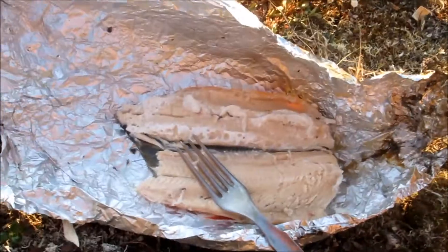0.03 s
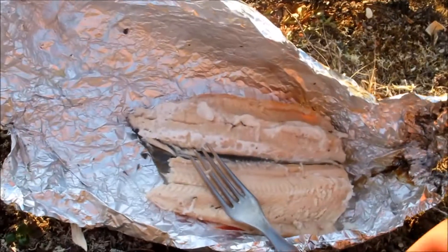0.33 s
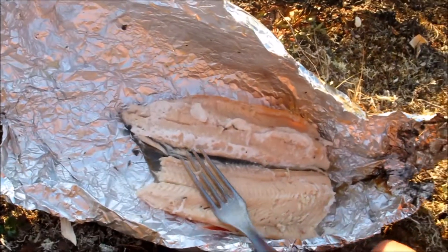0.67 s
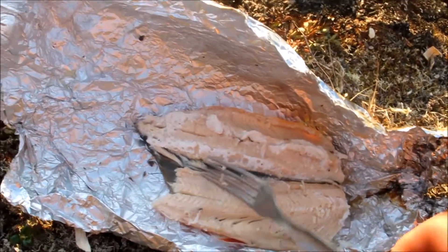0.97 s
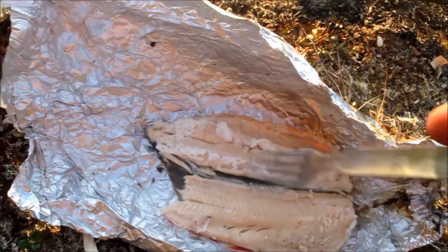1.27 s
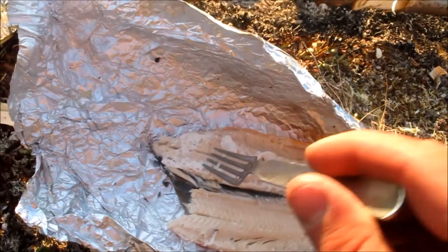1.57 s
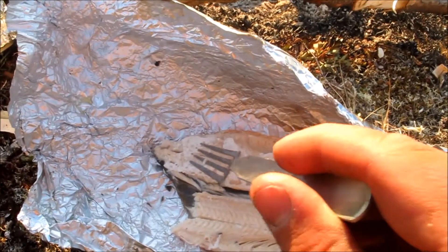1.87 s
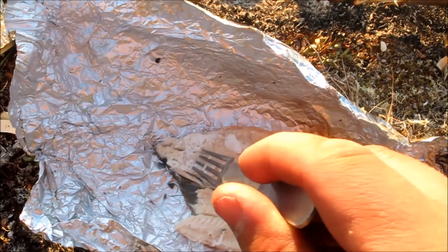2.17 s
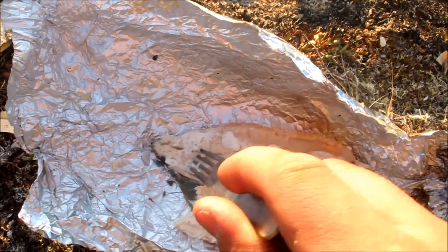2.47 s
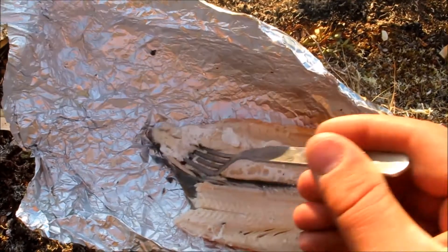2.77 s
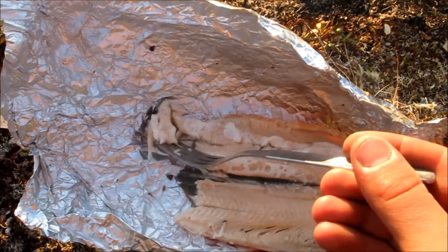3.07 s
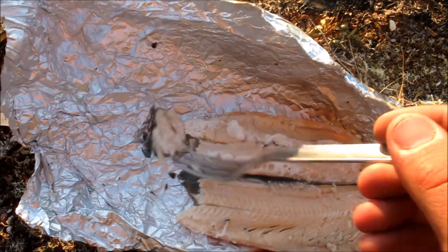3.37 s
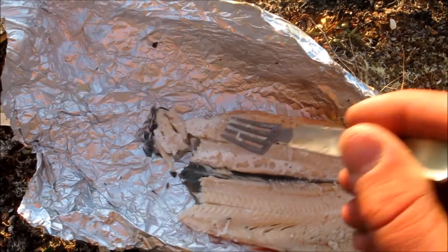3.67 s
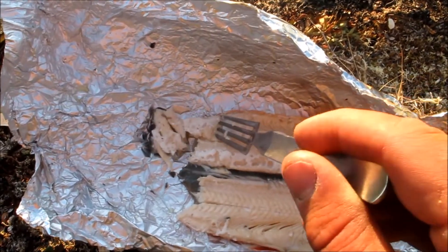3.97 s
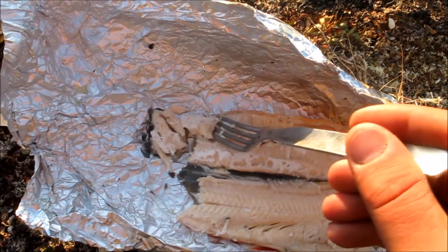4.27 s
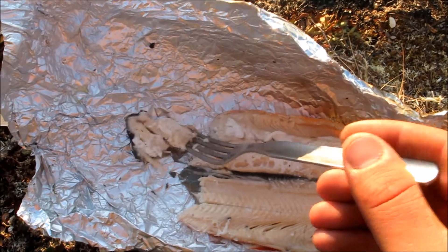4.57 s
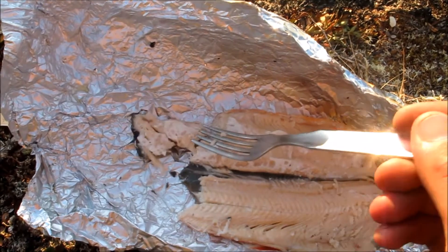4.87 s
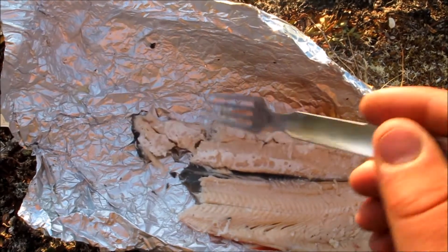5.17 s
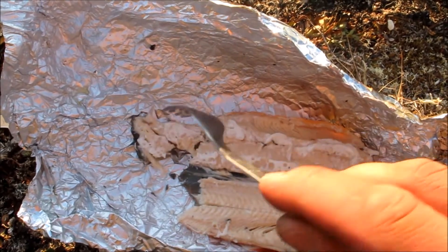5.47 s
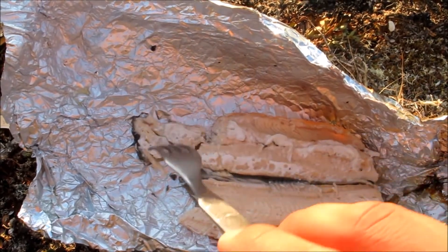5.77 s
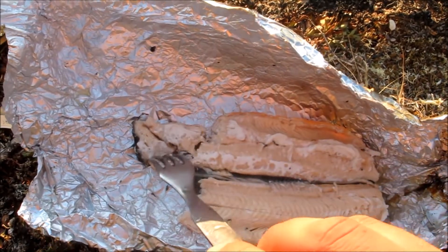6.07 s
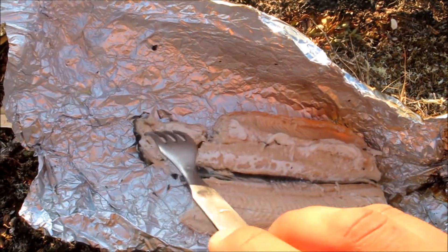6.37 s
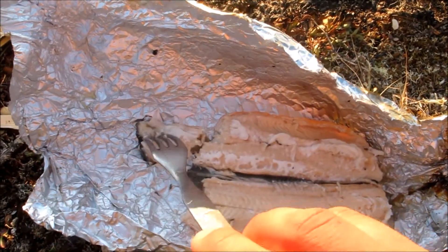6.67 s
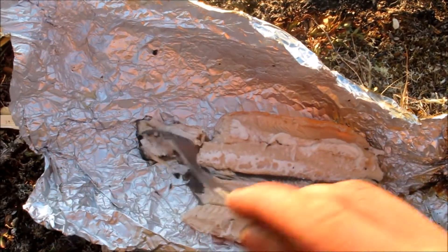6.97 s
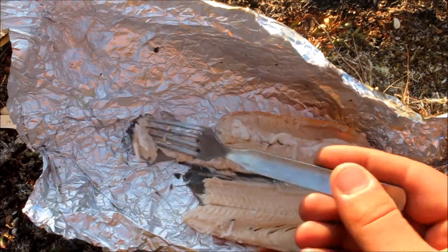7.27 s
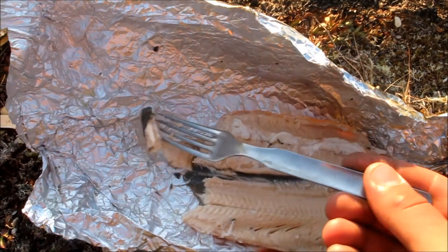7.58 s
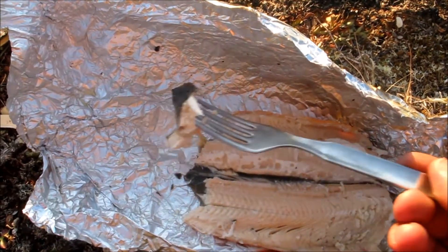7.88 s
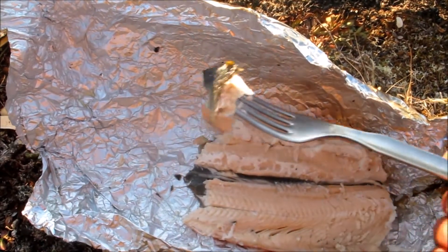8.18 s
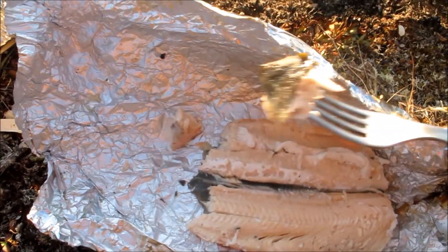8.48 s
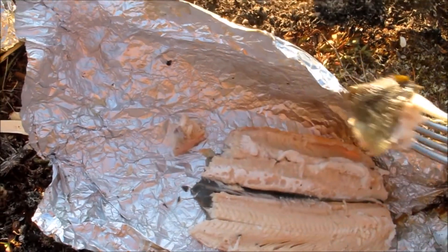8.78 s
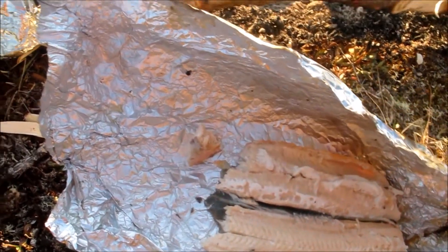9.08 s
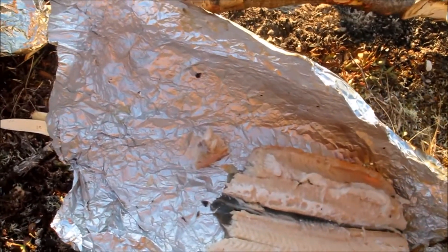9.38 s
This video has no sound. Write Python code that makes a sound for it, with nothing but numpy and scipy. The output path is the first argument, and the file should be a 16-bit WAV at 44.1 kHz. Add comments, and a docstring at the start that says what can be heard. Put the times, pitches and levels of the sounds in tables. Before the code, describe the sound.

A fork scrapes and pokes at fish on crackling foil, with a soft ember hiss and faint bird chirps late on.

```python
"""Sharp, bright snaps of crumpled foil, close by, as a fork lifts cooked fish from a sheet on the embers.
Each crease buckles, and the impulse rings one small facet and flexes the whole sheet. The tines scrape
by stick-slip friction and bump softly. Behind them the embers hiss and tick, a bird warbles far off
and low outdoor air rumbles. A small camera picks it all up; its gain ducks after the loudest snaps."""
import sys
import numpy as np
from scipy import signal
from scipy.fft import rfft, irfft, next_fast_len
from scipy.io import wavfile
from scipy.ndimage import uniform_filter1d

SR = 44100
rng = np.random.default_rng(int(sys.argv[2]) if len(sys.argv) > 2 else 0)


def bounce(signal):
    """Save signal as a 16-bit WAV file at the path given by the first command-line argument."""
    frames = np.transpose(np.atleast_2d(signal))
    limited = np.clip(frames, -1, 1)
    pcm = np.round(limited * 32767).astype(np.int16)
    wavfile.write(sys.argv[1], SR, pcm)


N = 415863
T = np.arange(N) / SR
RING_SAMPLES, PADDED = 2048, 2 * next_fast_len(N // 2 + 1)  # transform sizes: one ring, whole track
RING_FREQS = np.arange(RING_SAMPLES // 2 + 1) * SR / RING_SAMPLES + 1e-3
FREQS = np.arange(PADDED // 2 + 1) * SR / PADDED + 1e-3

# Levels are relative to the other rows of their table.
# loud snaps: t/s, level/dB, facet f/Hz, bandwidth/Hz, sheet re facet/dB, left minus right/dB
CREASE_SNAPS = [(.141, -35, 4960, 2800, -19.5, -1), (.209, -23.5, 5900, 900, -37, 0.5),
                (0.2413, -37.5, 5200, 1900, -8.5, -1), (.4647, -18, 6700, 1900, -35.5, 4),
                (0.5798, -32.5, 7400, 4000, -22, 1), (1.264, -33.5, 5030, 2800, -12.5, 4),
                (1.618, -34, 7100, 1300, -33, -1), (1.8954, -29.5, 4830, 1900, -18, 2),
                (1.9622, -31, 4900, 2800, -21, 1.5), (2.1266, -34.5, 5600, 600, -22, 1.5),
                (2.1613, -33, 6000, 1900, -7, -2.5), (2.1848, -24, 5200, 1300, -10, 3.5),
                (2.3283, -44, 5100, 400, 7, 2.5), (2.3605, -28.5, 7200, 1900, -4.5, -2),
                (2.3872, -26, 5240, 1300, -8.5, 1.5), (2.425, -32, 5200, 1300, -9, 0),
                (2.437, -31.5, 5930, 1300, -2.5, -5), (2.4496, -18.5, 5070, 600, -8.5, -2),
                (2.6031, -33, 4600, 900, -5.5, 6), (2.8663, -32, 5090, 1900, -35.5, 2),
                (2.9185, -34.5, 5400, 2800, -36, 7.5), (2.9809, -28, 4730, 906, -20.5, -1),
                (3.045, -34, 3500, 1300, -8, -7.5), (3.058, -33, 6170, 4000, -36, 2),
                (3.4633, -33.5, 5540, 1900, -10, -8), (3.568, -36, 4885, 4000, -20, 2),
                (3.7409, -36.5, 6400, 1886, -7, -6), (3.8004, -15.5, 4100, 3000, -10, .5),
                (3.9105, -29.5, 4600, 2776, -6.5, -1.5), (3.9281, -24.5, 4600, 2780, -7.5, 2),
                (3.9606, -36, 5300, 1310, 0, 2), (4.032, -28, 7800, 2800, -19.5, 2.5),
                (4.0855, -33, 2220, 404, -7.5, 0), (4.144, -30.5, 2283, 905, -16, 1),
                (4.1646, -27.5, 3800, 2780, -10, 0), (4.273, -20, 6430, 2800, -45, 1.5),
                (4.349, -21.5, 5250, 1300, -18.5, 3), (4.3967, -34.5, 4340, 1310, -4, 2),
                (4.4486, -34, 5120, 600, 7.5, 3), (4.4808, -27, 4940, 3970, -4, 2),
                (4.5113, -20.5, 4700, 905, -36, 1.5), (4.5954, -23.5, 8000, 5000, -12, -5),
                (4.6012, -25.5, 4350, 2820, -25.5, 4), (4.6122, -32.5, 4320, 600, -10.5, 2),
                (4.6451, -19, 5700, 2800, -42.5, 2), (4.6572, -29, 6000, 2800, -36.5, 0),
                (4.8029, -29, 5710, 1900, -17, 3), (5.101, -34.5, 4360, 1305, -10, -1),
                (5.1959, -38, 4540, 3963, -20, -2), (5.2249, -31.5, 5257, 4030, -13.5, 1.5),
                (5.2342, -35, 6960, 3996, -36.5, 5), (5.252, -32, 5600, 3990, -19.5, -2),
                (5.5986, -35, 4880, 1894, -8.5, 4.5), (5.8993, -20, 5200, 394, -46, -2),
                (5.929, -32, 4840, 1300, -27, -1), (5.938, -30.5, 6180, 1300, -23, 0),
                (5.9673, -30, 5100, 2800, -20, 1), (5.9817, -24.5, 7300, 1900, -15, 1.5),
                (6.049, -34.5, 5454, 1300, 4.5, 7), (6.114, -35, 5600, 1300, -9, -0.5),
                (6.1306, -33.5, 4970, 1300, -32, 1.5), (6.1428, -30.5, 5600, 2800, -13.5, 3.5),
                (6.1555, -30.5, 5080, 4020, -13, 1), (6.2381, -35, 4480, 900, -22, 2),
                (6.2562, -22.5, 4160, 3200, -20.5, 4), (6.383, -36.5, 5200, 1900, -21.5, 2.5),
                (6.446, -32.5, 5600, 2756, -25.5, 1.5), (6.4937, -40.5, 7110, 3910, -8.5, 1),
                (6.628, -30.5, 3640, 2800, -36, 2.5), (6.677, -19.5, 7080, 4070, -7.5, -0.5),
                (6.708, -11.5, 6400, 2000, -11, -3), (6.7194, -19.5, 5930, 2770, -6.5, 0),
                (6.7258, -14.5, 7100, 2810, -15, -4.5), (6.767, -28, 5300, 600, 7.5, 10.5),
                (6.7942, -33, 5760, 1300, -12.5, -6.5), (6.9508, -18.5, 4720, 900, -12.5, 0.5),
                (6.9635, -19, 4300, 3940, -10, 2), (6.9684, -25.5, 5170, 900, -0.5, 4),
                (6.9799, -31.5, 4450, 402, -10, 3), (7.0846, -22, 6280, 587, -18, 0.5),
                (7.3973, -27, 6110, 3990, -23, 4), (7.45, -22.5, 5450, 900, -26, 3.5),
                (7.478, -35, 5150, 1885, -4.5, 5.5), (7.562, -29, 9300, 3980, -36.5, 12),
                (7.8199, -29.5, 5940, 3970, -19.5, -1), (7.9594, -18, 6380, 3930, -40, 3),
                (8.0385, -29.5, 4600, 1890, -42.5, 3.5), (8.34, -34.5, 6000, 1923, -6.5, -1),
                (8.383, -33.5, 2016, 1300, -14.5, 2.5), (8.4279, -31.5, 5600, 2803, -4.5, 1),
                (8.687, -30.5, 7970, 4000, -18.5, 3), (8.8754, -39.5, 4600, 3945, -5.5, 1)]
# radiation of the whole sheet: f/Hz, level/dB
SHEET_RESPONSE = [(60, -16), (250, -12), (430, -9.5), (660, 4), (1050, -4), (1500, 2), (1950, -2),
                  (2400, -0.5), (3200, -2.5), (5000, -13), (14000, -23.5)]
# strokes of the fork: start t/s, end t/s, level/dB, sheet re facets/dB
FORK_STROKES = [(.657, 0.924, -47.5, -3.5), (1.094, 1.425, -56, 2), (1.632, 1.717, -45, -1),
                (2.143, 2.245, -42.5, 0), (2.28, 2.54, -47, 2.5), (2.569, 2.64, -47.5, 0),
                (2.699, 3.04, -44, -7), (3.135, 3.175, -42, -11), (3.409, 3.493, -37, -6),
                (3.713, 3.854, -47.5, -8), (3.902, 3.993, -44, -.5), (4.118, 4.366, -44.5, -8),
                (4.36, 4.57, -31, -11), (4.557, 4.66, -44.5, 0), (4.686, 4.758, -40, -6.5),
                (4.882, 4.96, -46, -10), (5.839, 5.968, -46.5, -2), (5.985, 6.088, -45.5, 5),
                (6.1, 6.29, -47, -3.5), (6.557, 6.812, -42, 1), (6.855, 7.076, -44, -1.5),
                (7.002, 7.3, -40.5, -6), (8.262, 8.624, -55, 5)]
# facets that the tines set ringing: f/Hz, bandwidth/Hz, level/dB
FACET_MODES = [(2280, 5600, 2), (2820, 2100, -7.5), (4600, 2900, 9), (5600, 590, 3), (6700, 570, -7),
               (10800, 10000, -25)]
# soft contacts of fork, fish and hand: t/s, peak level/dB, f/Hz, bandwidth/Hz
SOFT_CONTACTS = [(3.194, -36.5, 115, 45), (3.294, -38.5, 553, 158), (3.44, -24.5, 680, 600),
                 (3.441, -29.5, 180, 70), (4.812, -51, 60.3, 40.7), (4.898, -41, 630, 120),
                 (5.348, -44.5, 110, 100), (5.539, -43, 125.7, 58.6), (5.706, -43.5, 95.5, 45),
                 (5.948, -42.5, 70.6, 60), (8.426, -40, 231.3, 89.6), (8.486, -33, 135, 140),
                 (9.187, -33.5, 427, 169)]
# hiss of the embers: f/Hz, spectral level/dB
HISS_SPECTRUM = [(300, -108), (1400, -95), (2400, -91.5), (3200, -92), (4100, -93.5), (5300, -85.5),
                 (6800, -90), (8000, -90), (10000, -94.5), (16000, -101)]
# level of the background hiss: dips briefly just after the start, then drifts gently: t/s, level/dB
HISS_LEVEL = [(0, 5.5), (.1, -8), (.25, -2), (1.25, 1.5), (1.55, -0.5), (2.05, 0), (5.1, -1), (5.4, -4),
              (7.2, -1), (8.95, 1), (9.2, 3), (9.43, 2.5)]
# bird whistles: t/s, duration/s, f/Hz, glide from start to end/Hz, level/dB
BIRD_NOTES = [(7.236, 0.053, 4360, 327.5, -53.5), (7.359, 0.06, 4440, -520, -46.5),
              (7.414, 0.07, 4490, 299.5, -52.5), (7.533, 0.057, 4250, -450, -49.5),
              (7.587, 0.037, 4880, -350, -43.5), (7.696, 0.1, 4280, -280, -51),
              (7.779, .045, 4850, -300, -48.5), (7.879, 0.072, 4480, -180, -51),
              (8.028, 0.06, 4380, -450, -51.5), (8.168, 0.058, 4430, -440, -49),
              (9.136, 0.25, 4990, 46, -53.5), (9.149, 0.24, 4350, -67, -55)]
# low outdoor air: f/Hz, spectral level/dB
AIR_SPECTRUM = [(20, -85.5), (55, -82), (110, -82.5), (200, -84.5), (370, -90.5), (650, -90.5), (1300, -96),
                (2500, -108), (8000, -115)]
# rumble of the hand shifting on the camera: start t/s, end t/s, level re still air/dB
HAND_SHIFTS = [(0.51, 0.954, 1.5), (1.114, 1.492, 3.5), (2.3, 2.613, 3), (2.9, 3.61, 2),
               (4.425, 4.602, 8.5), (5.304, 5.752, -7.5), (5.895, 6.247, 3), (8.201, 8.649, 5.5),
               (8.994, 9.43, 0)]
# bands of a faint whirr: f/Hz, bandwidth/Hz, spectral level/dB
WHIRR_BANDS = [(1136, 36, -85.5), (1795, 53, -87.5), (2004, 18, -84.5), (2123, 37, -84.5),
               (2342, 45, -80.5), (2466, 27, -78.5), (4090, 66, -82.5), (6330, 49, -86), (6740, 45, -83)]
# distant hums: start t/s, end t/s, f/Hz, level/dB
HUM_SWELLS = [(4, 5.103, 431, -65.5), (5.097, 5.849, 677, -84)]
# microphone response: f/Hz, gain/dB
MIC_RESPONSE = [(6900, 0.5), (8500, -7), (12000, -11.5), (16000, -14)]
# mismatch of the two microphone ports: f/Hz, left minus right/dB, left phase lead/rad
PORT_MISMATCH = [(1200, .2, 0), (2400, 2.2, .1), (4000, 4, -.15), (4900, 6, -.7), (5800, 3.5, -1.5),
                 (6600, 0, -1.4), (8500, -4, -1.2), (14000, -6, -2.2)]


def foil_snaps(rows, give_s=0.00035, rattle_s=0.0013, tail_s=0.008, scatter=1.5):
    """Snap-through buckling: a crease gives way, and its impulse rings a facet and flexes the sheet."""
    out = np.zeros((2, N))
    t = (np.arange(RING_SAMPLES) - RING_SAMPLES // 32) / SR
    gap, impulse, sheet = np.abs(t), t == 0, sheet_response(RING_FREQS)
    giving = 0.51 * np.exp(-gap / give_s)
    settling = 0.2 * np.exp(-gap / rattle_s) + 0.027 * np.exp(-gap / tail_s)
    rattle = np.where(t < 0, giving, settling)
    for start, db, hz, width, sheet_db, pan_db in rows:
        # short waves scatter differently towards each port; the sheet's long waves reach both alike
        common, sides = rng.standard_normal(RING_SAMPLES), rng.standard_normal((2, RING_SAMPLES))
        push = impulse + rattle * (common + scatter * sides) / np.hypot(1, scatter)
        ring = irfft(rfft(push) * facet_response(RING_FREQS, hz, width))
        ring = np.array([unit(ring[0]) * undb(pan_db / 2), unit(ring[1]) * undb(-pan_db / 2)])
        flex = unit(irfft(rfft(impulse + .5 * rattle * common) * sheet))
        snap = (ring - undb(sheet_db) * flex) * undb(db)
        add(out, start + t[0], snap * np.sqrt(.005 * SR / RING_SAMPLES))  # energy of 5 ms at that level
    return out


def facet_response(f, hz, width):
    """A small radiator is inefficient at long wavelengths: one mode, cut below a third of its pitch."""
    return unit(resonance(f, hz, width) * (f / (f - .33j * hz)) ** 2)


def sheet_response(f):
    """Causality: the whole sheet rings only after a push, so its spectrum is given minimum phase."""
    cepstrum = irfft(np.log(undb(along(SHEET_RESPONSE, f))))
    half = len(cepstrum) // 2
    causal = np.r_[cepstrum[0], 2 * cepstrum[1:half], np.zeros(half)]
    return unit(np.exp(rfft(causal)))


def foil_strain(t, full_db=-36, flurry_s=.028):
    """Strain, from 0 to 1, builds before each loud snap and relaxes exponentially after it."""
    return np.tanh(sum(undb(db + sheet_db - full_db) * np.exp(-np.abs(t - start) / flurry_s)
                       for start, db, _, _, sheet_db, _ in CREASE_SNAPS))


def crinkles(idle_per_s=3.5, flurry_per_s=55, limit=400, step_s=.002):
    """Crackling noise: rows of faint random snaps whose rate and strength rise with the strain."""
    t = np.arange(0, N / SR, step_s)
    strain = foil_strain(t)
    expected_count = np.cumsum(idle_per_s + flurry_per_s * strain) * step_s
    thresholds = np.arange(limit) + rng.random(limit)
    rows = []
    for start in np.interp(thresholds[thresholds < expected_count[-1]], expected_count, t):
        size, pitch, damping, flex, side = rng.standard_normal(5)
        db = -45.5 + 8 * np.interp(start, t, strain) + 2 * size
        hz, width = 5200 * 2 ** (0.095 * pitch), 1800 * 2 ** (.5 * damping)
        sheet_db, pan_db = -14 + 3 * flex, 6.5 + 4.5 * side
        rows.append((start, db, hz, width, sheet_db, pan_db))
    return rows


def fork_scrapes(slips_per_s=1100, smear=0.064):
    """Stick-slip friction: tines drag over wrinkles, and micro-slips excite the facets and the sheet."""
    facet_force, sheet_force = np.zeros(N), np.zeros(N)
    for start, end, db, sheet_db in FORK_STROKES:
        force = undb(db) * swell(start, end)
        facet_force += force
        sheet_force += force * undb(sheet_db)
    grip = unit(undb(3.6 * walk(150)))  # the tines catch and let go
    slips = [crackle(slips_per_s, spread_db=1.0, scatter=0.63) for _ in FACET_MODES]
    rings = np.zeros((2, N))
    for clicks, (hz, width, db) in zip(slips, FACET_MODES):
        ring = irfft(facet_response(RING_FREQS, hz, width))
        rings += undb(db) * signal.oaconvolve(clicks, ring[None], axes=1)[:, :N]
    drag = unit(sum(slips).mean(axis=0)) + smear * rng.standard_normal(N)
    flex = signal.oaconvolve(drag, irfft(sheet_response(RING_FREQS)))[:N]
    return grip * (facet_force * unit(rings) + sheet_force * unit(flex))


def soft_bumps(samples=8192):
    """Impulse response: each soft contact drives one heavily damped low mode."""
    out = np.zeros(N)
    f = np.arange(samples // 2 + 1) * SR / samples + 1e-3
    for start, db, hz, width in SOFT_CONTACTS:
        thud = irfft(resonance(f, hz, width) * resonance(f, hz, 2 * hz))
        add(out, start, undb(db) * thud / np.abs(thud).max())
    return out


def embers(tick_db=-60, ripple_db=4.0):
    """Filtered noise: an unevenly coloured hiss, with random impulses ringing as faint ticks."""
    ripple = unit(uniform_filter1d(rng.standard_normal(len(FREQS)), size=600))
    colour = undb(along(HISS_SPECTRUM, FREQS) + ripple_db * ripple)
    hiss = shape(noise(correlation=0.42), colour) * undb(.5 * walk(13))
    pops = crackle(per_s=80, spread_db=2.5, scatter=.3)
    ticks = shape(pops, facet_response(FREQS, hz=4660, width=2200))
    return (hiss + undb(tick_db) * ticks) * undb(np.interp(T, *np.transpose(HISS_LEVEL)))


def distant_bird(gain_db=-5.0, waver=0.013, arch=0.415, low_ratio=0.71, echo_db=-4, echo_s=0.083):
    """Frequency modulation: arched whistles, each with a weaker lower line, smeared by outdoor echoes."""
    song, drift = np.zeros(N), 1 + waver * walk(430)
    for start, duration, pitch, glide, db in BIRD_NOTES:
        progress = np.linspace(0, 1, int(duration * SR))
        sag = arch * abs(glide) * (2 * progress - 1) ** 2
        hz = (pitch + glide * (progress - .5) - sag) * drift[int(start * SR):][:len(progress)]
        phase = 2 * np.pi * np.cumsum(hz) / SR
        whistle = np.sin(phase) + undb(-11) * np.sin(low_ratio * phase)
        add(song, start, undb(db + gain_db) * np.sqrt(2) * np.sin(np.pi * progress) * whistle)
    echoes = rng.standard_normal((2, N)) * np.exp(-T / echo_s)
    return shape(song, 1 + undb(echo_db) * unit(rfft(echoes, PADDED)))


def low_air(gain_db=-1.24):
    """Addition of powers: restless low air noise swells with the rumble of the shifting hand."""
    hand = sum(undb(db) * swell(start, end) for start, end, db in HAND_SHIFTS)
    air = shape(noise(correlation=0.77), undb(along(AIR_SPECTRUM, FREQS)))
    return air * undb(gain_db + 2.0 * walk(25)) * np.hypot(1, hand)


def whirr():
    """Resonant filtering: noise confined to several narrow bands is heard as a faint steady whirr."""
    power = sum(np.abs(undb(db) * resonance(FREQS, hz, width)) ** 2 for hz, width, db in WHIRR_BANDS)
    return shape(noise(correlation=0.97), np.sqrt(power))


def distant_hums(width_hz=23):
    """Narrow-band noise has a pitch: each faint hum swells and fades around one frequency."""
    out = np.zeros(N)
    for start, end, hz, db in HUM_SWELLS:
        hum = shape(rng.standard_normal(N), resonance(FREQS, hz, width_hz) ** 2)
        out += undb(db) * swell(start, end) * unit(hum)
    return out


def crackle(per_s, spread_db, scatter):
    """Poisson process: tiny stereo clicks, mostly weak, each from its own direction."""
    out, hits = np.zeros((2, N)), np.flatnonzero(rng.random(N) < per_s / SR)
    chance = rng.standard_normal((4, len(hits)))
    strength = np.minimum((chance[0] ** 2 + chance[1] ** 2) / 2, 4)
    out[:, hits] = np.sign(chance[0]) * undb(spread_db * strength) * (1 + scatter * chance[2:])
    return unit(out)


def noise(correlation):
    """Partial coherence: white noise at 0 dB per Hz, with a part common to both sides."""
    common = np.sqrt(correlation) * rng.standard_normal(N)
    sides = np.sqrt(1 - correlation) * rng.standard_normal((2, N))
    return (common + sides) * np.sqrt(SR / 2)


def resonance(f, hz, width):
    """Response of a damped oscillator, with gain 1 at its centre."""
    return 1 / (1 + 1j * (f * f - hz * hz) / (f * width))


def shape(x, response):
    """Convolution theorem: filter a track by multiplying its spectrum."""
    return irfft(rfft(x, PADDED) * response)[..., :N]


def swell(start, end):
    """Half-sine envelope between two times."""
    out = np.zeros(N)
    add(out, start, np.sin(np.linspace(0, np.pi, int((end - start) * SR))))
    return out


def walk(steps_per_s):
    """A moving average smooths random steps into a drift of rms 1."""
    hold = int(SR / steps_per_s)
    steps = np.repeat(rng.standard_normal(N // hold + 1), hold)
    return unit(uniform_filter1d(steps, hold)[:N])


def along(table, f, column=1):
    """Interpolate one column on a log-frequency axis."""
    rows = np.array(table)
    return np.interp(np.log(f), np.log(rows[:, 0]), rows[:, column])


def add(out, start, x):
    """Superpose x on out from a start time."""
    i = max(int(start * SR), 0)
    out[..., i:i + x.shape[-1]] += x[..., :N - i]


def undb(db):
    """Decibels to amplitude ratio."""
    return 10 ** (np.asarray(db) / 20)


def unit(x):
    """Normalise to rms 1."""
    return x / np.sqrt(np.mean(np.abs(x) ** 2))


def scene():
    """Superposition: foil and fork close by, over embers, a bird and the open air."""
    foil = undb(-1.0) * foil_snaps(CREASE_SNAPS + crinkles())
    fork = fork_scrapes() + soft_bumps()
    fade_in = undb(np.interp(T, [.1, .5], [-5, 0]))
    outdoors = (low_air() + whirr()) * fade_in + distant_hums()
    return foil + fork + embers() + distant_bird() + outdoors


def record(dry, knee_db=-28, release_s=0.15, lag_s=0.00067, cutoff_hz=15800):
    """Automatic gain control: sound from two unequal ports is ducked, clipped and low-pass filtered."""
    port = undb(along(PORT_MISMATCH, FREQS) / 2) * np.exp(.5j * along(PORT_MISMATCH, FREQS, column=2))
    picked_up = shape(dry, undb(along(MIC_RESPONSE, FREQS)) * np.array([port, 1 / port]))
    decay = np.exp(-1 / (release_s * SR))
    power = signal.lfilter([1 - decay], [1, -decay], np.mean(picked_up ** 2, axis=0))
    late_power = np.interp(T - lag_s, T, power)  # the onset of a snap passes before the gain falls
    ducked = picked_up / np.sqrt(1 + late_power / undb(knee_db) ** 2)
    treble_cut = signal.ellip(8, .2, 70, cutoff_hz, fs=SR, output="sos")
    return signal.sosfilt(treble_cut, np.clip(ducked, -1, 1))


dry = scene()
out = record(dry)
bounce(out)
```